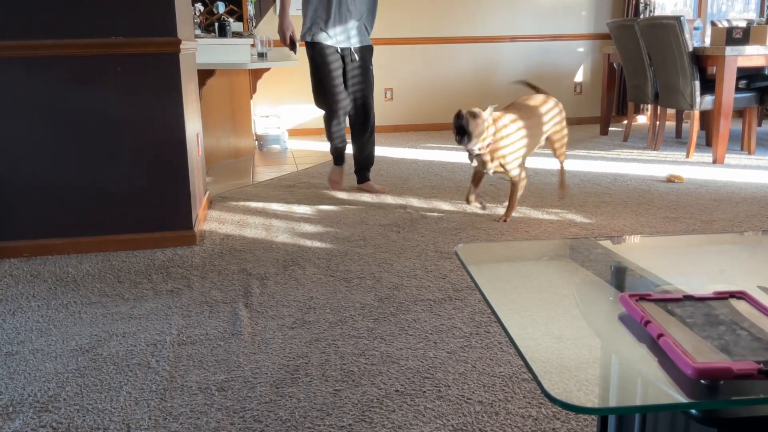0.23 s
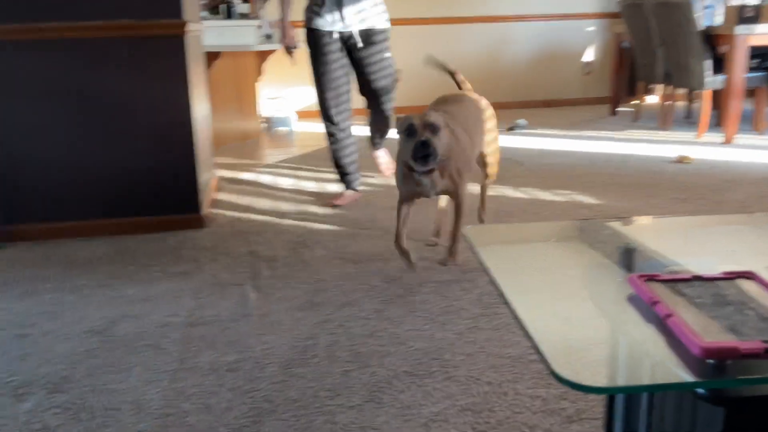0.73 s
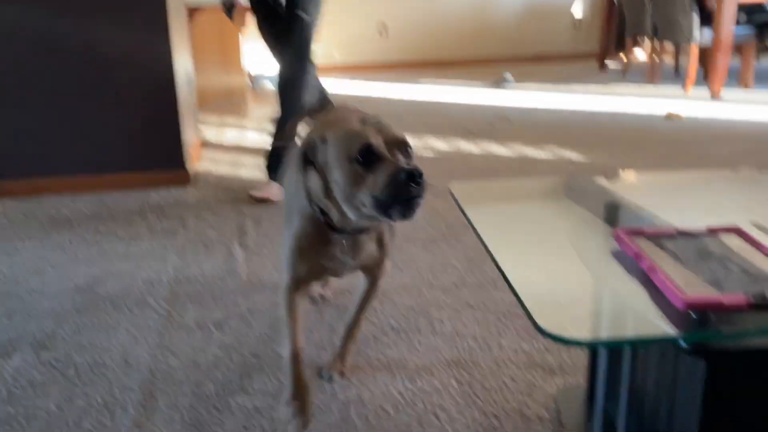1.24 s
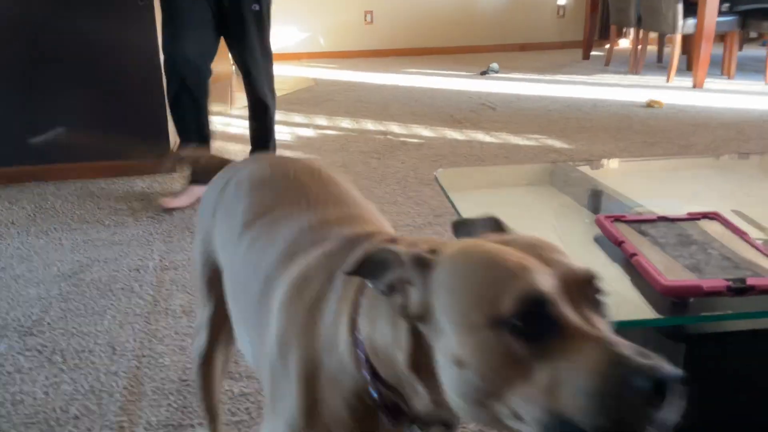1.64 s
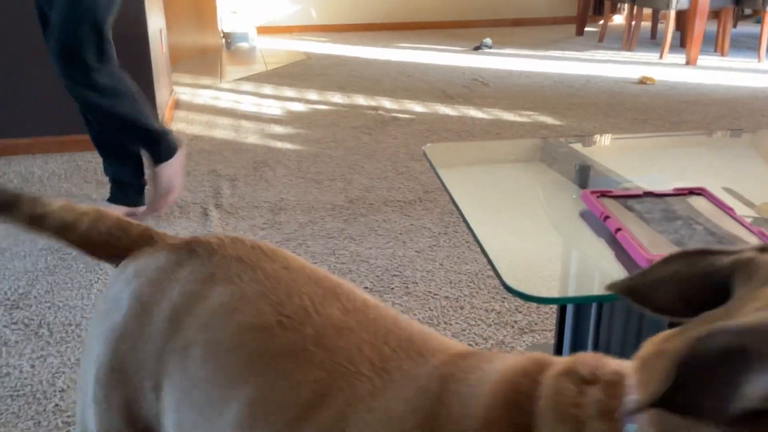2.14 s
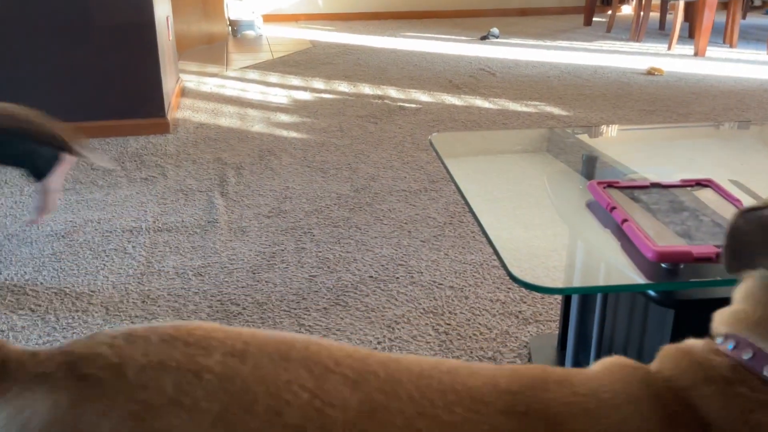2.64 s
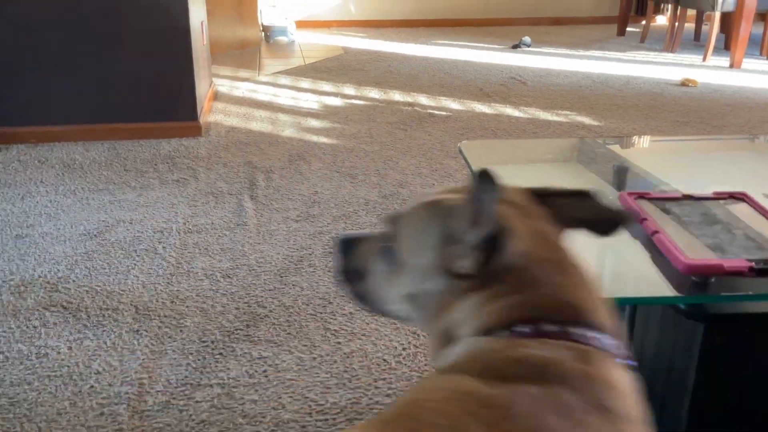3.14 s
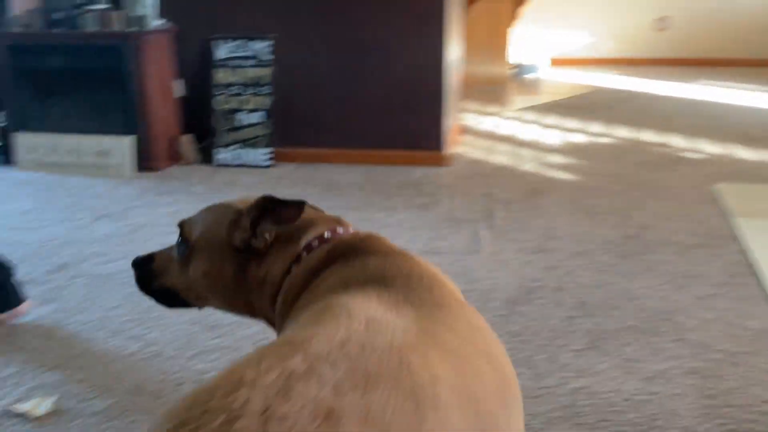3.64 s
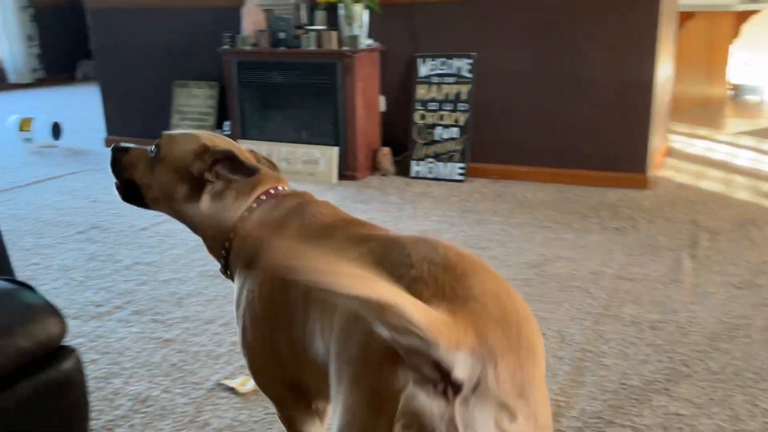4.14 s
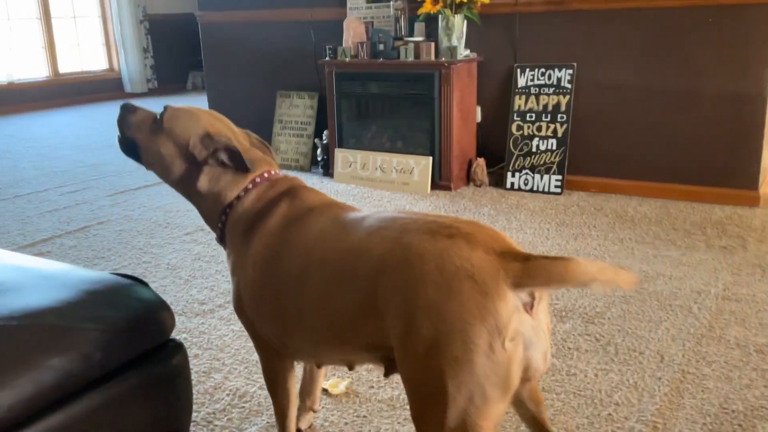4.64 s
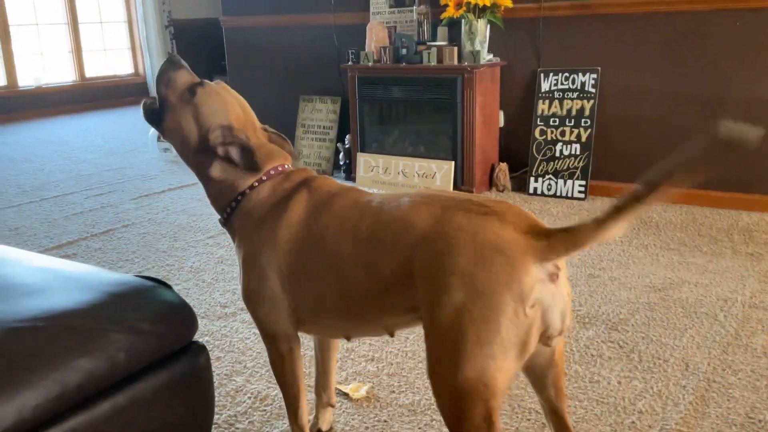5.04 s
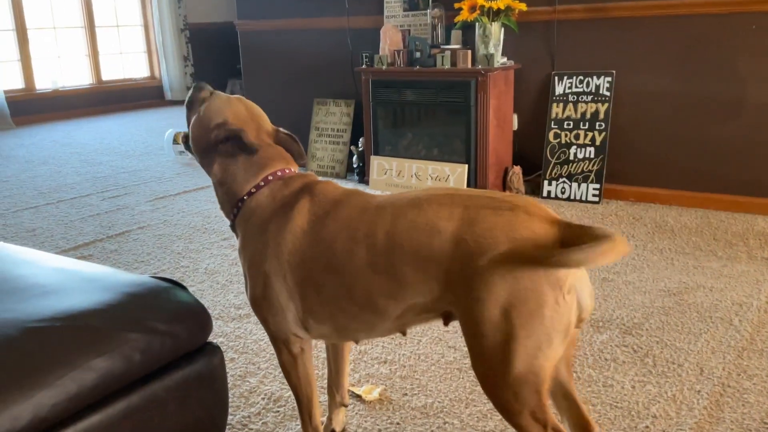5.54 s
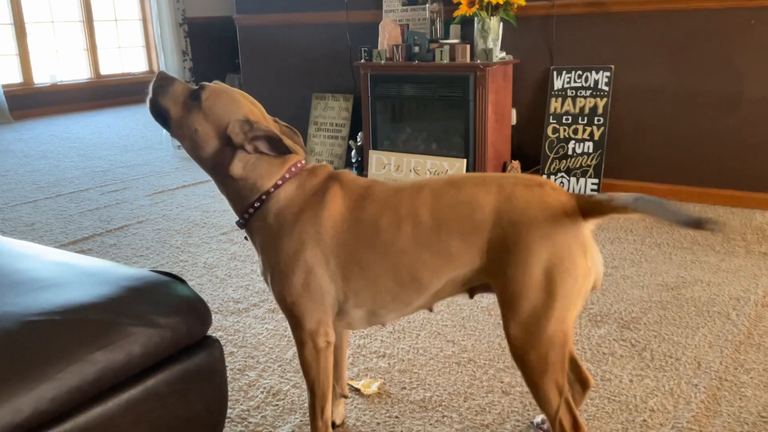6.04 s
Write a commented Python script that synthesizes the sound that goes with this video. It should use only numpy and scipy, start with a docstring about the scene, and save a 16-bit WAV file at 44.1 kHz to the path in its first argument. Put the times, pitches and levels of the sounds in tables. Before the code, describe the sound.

Hoarse, cracking barks from a big dog approaching in a carpeted living room, while a second dog holds one long, slowly sinking howl.

```python
"""Hoarse barks come first, over the last of an earlier howl: a big dog trots across a carpeted living room,
from a few metres off to half a metre from the microphone. Its voice breaks from clear tone to rough roar.
A second dog holds one long, slowly sinking howl, a nearly pure tone, and the first barks on over it.
Between the calls come snorts of filtered noise, ringing collar clicks, soft low thumps and a run of faint,
fast double clicks, all above the quiet noise of the room."""
import sys
import numpy as np
from scipy import signal
from scipy.fft import rfft, irfft
from scipy.io import wavfile
from scipy.ndimage import uniform_filter1d, minimum_filter1d

SR = 44100
rng = np.random.default_rng(int(sys.argv[2]) if len(sys.argv) > 2 else 0)


def persist_wave(psi):
    """Save psi, clipped to +-1, as 16-bit WAV."""
    counts = np.round(np.clip(psi, -1, 1) * 32767).astype(np.int16)
    wavfile.write(sys.argv[1], SR, np.atleast_2d(counts).T)


N = 276948
T = np.arange(N) / SR  # seconds


def undb(db):
    """Decibels to gain."""
    return 10 ** (np.asarray(db) / 20)


def unit(x):
    """Scale to rms 1."""
    return x / np.sqrt(np.mean(x ** 2))


def smooth(x, size=500):
    """Round off corners with two running means of the given size in samples."""
    return uniform_filter1d(uniform_filter1d(x, size), size)


def steady(x, size=1300):
    """Hold the short-term rms near 1."""
    return x / np.sqrt(smooth(x ** 2, size) + 1e-9)


def ramp(start, length):
    """0 before the start, rising evenly to 1 over the length."""
    return np.clip((T - start) / max(length, 1e-3), 0, 1)


def fade(start, t60):
    """A sudden start and an exponential decay by 60 dB in t60 seconds."""
    return (T >= start) * np.exp(-np.log(1000) * np.clip((T - start) / t60, 0, 2))


def curves(rows):
    """The columns of a table as values for every sample."""
    s, *columns = np.transpose(rows)
    return [np.interp(T, s, column) for column in columns]


def during(rows):
    """1 while a table lasts, with soft edges."""
    lasting = (T >= rows[0][0]) & (T <= rows[-1][0])
    return uniform_filter1d(1. * lasting, size=1200)


def noise():
    """White noise."""
    return rng.standard_normal(N)


def wobble(hz):
    """Random motion slower than hz, spread 1."""
    return unit(signal.sosfilt(signal.butter(2, hz, fs=SR, output="sos"), noise()))


def phase_of(hz):
    """Phase in radians of a tone that follows a pitch curve."""
    return 2 * np.pi * np.cumsum(hz) / SR


def band(x, lo_hz, hi_hz, order=4):
    """Band-pass."""
    edges = [lo_hz, min(hi_hz, SR / 2 - 1)]
    return signal.sosfilt(signal.butter(order, edges, "band", fs=SR, output="sos"), x)


def colour(x, points, peaks=()):
    """Filter by a (Hz, dB) outline and (Hz, width in Hz, lift in dB) resonances."""
    f = np.fft.rfftfreq(len(x), 1 / SR) + 1e-3  # keeps the logarithm finite
    hz, db = np.transpose(points)
    gain_db = np.interp(np.log(f), np.log(hz), db)
    for centre, width, lift in peaks:
        gain_db = gain_db + lift / (1 + (2 * (f - centre) / width) ** 2)
    return irfft(rfft(x) * undb(gain_db), len(x))


def bounce(x, lag=0.00083, sway=0.00031, share=0.85):
    """A reflection off a nearby surface; its lag in seconds sways, so notches wander through the treble."""
    return x + share * np.interp(T - lag - sway * wobble(1.6), T, x)


def room(x, wet_db, t60=0.43, treble_t60=0.34):
    """Direct sound plus a dense tail from walls and furniture; the treble dies sooner."""
    t = T[:SR]
    lows = band(rng.standard_normal(SR), 100, 3000) * np.exp(-np.log(1000) * t / t60)
    highs = band(rng.standard_normal(SR), 3000, 16000) * np.exp(-np.log(1000) * t / treble_t60)
    tail = (lows + highs) * (t > .004)
    wet = signal.fftconvolve(x, tail / np.sqrt(np.sum(tail ** 2)))[:N]
    return (x + undb(wet_db) * wet) / np.sqrt(1 + undb(2 * wet_db))


# The quiet living room with nobody calling. Each row: frequency in Hz, outline of the noise in dB.
QUIET_ROOM = [(35, -26.5), (80, -7), (250, 0.5), (500, -7), (1000, -7), (2500, -15), (5000, -31),
              (9000, -24.5), (15500, -26)]


def room_floor(level_db=-68):
    """The room at rest: coloured noise whose level drifts by about a decibel."""
    return undb(level_db + wobble(3)) * unit(colour(noise(), QUIET_ROOM))


# The damped modes that ring in each faint click.
# Each row: frequency in Hz, relative level in dB, 60 dB decay in seconds.
DOUBLE_CLICK_MODES = [(245, -21, 0.083), (1015, -1, 0.089), (1066, -10.5, 0.048), (1920, -10, 0.029),
                      (3500, -18, 0.025)]
DOUBLE_CLICKS_START_S, DOUBLE_CLICKS_PERIOD_S = 2.3728, .0419


def double_clicks(spacing_s=0.0098, level_db=-53, crack_db=-5, count=14):
    """Fourteen faint, evenly spaced double clicks, each a short ring of damped modes and a brief crack."""
    t = T[:SR // 10]
    ring = sum(undb(db) * np.exp(-np.log(1000) * t / t60) * np.sin(2 * np.pi * hz * t)
               for hz, db, t60 in DOUBLE_CLICK_MODES)
    crack = undb(crack_db) * np.exp(-t / 0.00038) * rng.standard_normal(len(t))
    firsts = DOUBLE_CLICKS_START_S + DOUBLE_CLICKS_PERIOD_S * np.arange(count)
    seconds = firsts + spacing_s + 0.00047 * rng.standard_normal(count)
    samples = (np.concatenate([firsts, seconds]) * SR).astype(int)
    strengths = undb(1.5 * rng.standard_normal(2 * count))
    pulses = np.bincount(samples, strengths, N)
    return undb(level_db) * signal.fftconvolve(pulses, ring + crack)[:N]


# Soft thumps of paws on the carpet and of air on the microphone.
# Each row: start in seconds, level in dB before the room, frequency in Hz, 60 dB decay in seconds.
THUMP_HITS = [(1.07, -49.5, 51, 0.19), (1.391, -49.5, 49.7, 0.22), (1.95, -81, 71.5, 0.35),
              (2.461, -53.5, 70, 0.22), (3.09, -63, 65.5, 0.26), (3.784, -32.5, 218, 0.03),
              (3.802, -45, 94.96, 0.073)]


def thumps():
    """Dull thumps: low sine tones that start suddenly and decay."""
    return sum(undb(db) * fade(s, t60) * np.sin(2 * np.pi * hz * (T - s)) for s, db, hz, t60 in THUMP_HITS)


# The collar clicking. Each row: start in seconds, level in dB before the common trim, ring in Hz.
COLLAR_CLICKS = [(0.9233, -60.5, 3720), (2.2637, -28, 7710), (2.36, -50.5, 3470), (2.4843, -55, 14170),
                 (2.529, -47.5, 3460), (2.9213, -37.5, 10300), (3.001, -33.5, 3100), (5.3556, -32, 4390)]


def collar_clicks(t60=0.029, trim_db=-8):
    """Bright clicks: decaying bursts of noise in a wide band around each ring."""
    rattle = noise()
    return sum(undb(db + trim_db) * fade(s, t60) * unit(band(rattle, hz / 2, hz * 5.2, order=2))
               for s, db, hz in COLLAR_CLICKS)


# Puffs through the nose. Each row: centre in seconds, half length in seconds, nasal hum in dB and
# hiss in dB, both before the room.
NOSE_PUFFS = [(1.771, 0.056, -52, -40), (3.362, 0.046, -36, -51.5), (3.461, 0.049, -51, -38),
              (4.714, 0.0079, -38, -57), (5.416, 0.034, -37, -52.5)]
# Colour of breath noise, here and in the howl. Each row: frequency in Hz, level in dB.
BREATH_COLOUR = [(1500, -19), (2200, -8.5), (3000, -6), (4200, -3.5), (5300, -12), (6500, -7.5),
                 (9000, -14.5), (12000, -25), (15500, -30.5)]
# Resonances of the muzzle. Each row: frequency in Hz, width in Hz, lift in dB.
MUZZLE = [(2930, 120, 11.5), (4300, 190, 3.5)]


def snorts(flutter_db=1.0):
    """Puffs of air hiss at the quivering nostrils and ring the muzzle."""
    flutter = undb(flutter_db * wobble(60))
    hiss = unit(bounce(colour(noise(), BREATH_COLOUR, MUZZLE)) * flutter)
    hum = unit(band(noise(), 940, 1250, order=3))
    return sum(np.exp(-((T - s) / half) ** 2) * (undb(hum_db) * hum + undb(hiss_db) * hiss)
               for s, half, hum_db, hiss_db in NOSE_PUFFS)


def whine(rows, second_db, third_db, jitter=0.0034):
    """A short closed-mouth tone of three harmonics; the upper two are in dB against the first."""
    hz, db = curves(rows)
    phase = phase_of(hz * (1 + jitter * wobble(60)))
    tone = np.sin(phase) + undb(second_db) * np.sin(2 * phase) + undb(third_db) * np.sin(3 * phase)
    return tone * undb(db) * during(rows)


# A low grumble that leads into a bark. Each row: time in seconds, pitch in Hz, first harmonic in dB
# before the room.
LOW_GRUMBLE = [(3.98, 218, -66.5), (4.05, 202, -63), (4.13, 203, -55), (4.18, 219, -52.5), (4.22, 260, -54)]


def grumble():
    """A low voiced tone whose second harmonic is stronger than its first."""
    return whine(LOW_GRUMBLE, second_db=4, third_db=-2)


# The end of an earlier howl. Each row: time in seconds, pitch in Hz, first harmonic in dB before the room.
EARLIER_HOWL = [(0, 802, -16), (.09, 726, -24.5), (.15, 729, -14.5), (.21, 670, -64)]


def last_howl():
    """A nearly pure tone that sinks and stops."""
    return whine(EARLIER_HOWL, second_db=-22, third_db=-20)


# The second dog's howl scoops up and sinks slowly. Each row: time in seconds, pitch in Hz.
HOWL_PITCH = [(2.91, 496.9), (2.954, 628.1), (3.0, 755.9), (3.032, 786), (3.096, 838), (3.174, 820),
              (3.368, 774.6), (3.386, 761.4), (3.854, 713.5), (4.02, 725.6), (4.18, 680.6)]
# Then it wavers on under the barks. Each row: time in seconds, pitch in Hz.
HOWL_WAVERING = [(4.462, 661.7), (4.675, 677), (4.731, 659.7), (4.795, 622.2), (4.917, 655.5), (5.188, 653),
                 (5.24, 624), (5.4, 627.6)]
# Its strength. Each row: time in seconds, fundamental in dB, second harmonic in dB, gain of the higher
# harmonics in dB.
HOWL_STRENGTH = [(2.905, -61, -80, -104), (2.96, -28, -49.5, -64), (3.05, -14, -43, -52.5),
                 (3.24, -13, -41.5, -51), (3.58, -26, -26, -56.5), (3.82, -20.5, -40, -59.5),
                 (4.0, -24.5, -48.5, -60.5), (4.11, -20, -45, -60), (4.3, -27, -36.5, -61),
                 (4.62, -17.5, -43.5, -63.5), (4.83, -19.5, -37, -66.5), (4.91, -16.5, -34, -71),
                 (5.05, -23.5, -34.5, -63), (5.13, -14.5, -42.5, -66), (5.205, -13.5, -49, -59.5),
                 (5.235, -33, -36.5, -58.5), (5.43, -24, -37.5, -55.5), (5.55, -27, -45, -60)]
# Brief dips where the tone cancels against its own echo. Each row: centre in seconds, depth in dB.
ECHO_DIPS = [(3.004, -11), (3.105, -4.5), (3.314, -3), (3.387, -7), (3.591, -14.5), (3.759, -18.5),
             (3.897, -13.5), (3.98, -5.5), (4.152, -11), (4.205, -15.5), (4.5, -7), (4.564, -12.5),
             (4.692, -14), (4.785, -8.5), (4.864, -14.5), (5.3, -5), (5.397, -24.5)]
# The howling throat above the second harmonic. Each row: frequency in Hz, level in dB.
HOWLING_THROAT = [(1400, -3.5), (1900, 4.5), (2250, 18), (2550, -1), (2950, -1), (3400, 4.5), (3900, -8.5),
                  (4450, -5), (5200, -4), (6100, -14), (8000, -11.5), (11000, -13), (15000, -21.5)]
# Its sharp resonances. Each row: frequency in Hz, width in Hz, lift in dB.
HOWLING_RESONANCES = [(2630, 33, 22.5), (3437, 170, 5.5), (4484, 220, 9)]
DIP_HALF_S = 0.013
THROB_DB, THROB_HZ = 1.2, 28  # the fundamental throbs at random


def howl(jitter=.005, air_db=-18, flutter_db=6.5):
    """A nearly pure head tone with thin overtones, which flutter as they mix with their own echoes."""
    hz, = curves(np.vstack([HOWL_PITCH, HOWL_WAVERING]))
    db, second_db, upper_db = curves(HOWL_STRENGTH)
    phase = phase_of(hz * (1 + jitter * wobble(100)))
    dips_db = sum(depth_db * np.exp(-((T - s) / DIP_HALF_S) ** 2) for s, depth_db in ECHO_DIPS)
    dips = undb(THROB_DB * wobble(THROB_HZ) + dips_db)
    tone = np.sqrt(2) * smooth(undb(db)) * np.sin(phase)
    second = np.sqrt(2) * undb(second_db + flutter_db * wobble(3.4)) * np.sin(2 * phase)
    # each overtone swells and fades on its own as it glides through the standing waves of the room
    harmonics = sum(undb(3.5 * wobble(7)) * np.sin(k * phase) for k in np.arange(3, 23))
    upper = colour(harmonics, HOWLING_THROAT, HOWLING_RESONANCES)
    # breath escapes in step with the voice
    air = undb(air_db) * unit(colour(noise(), BREATH_COLOUR)) * (1 + np.cos(phase))
    overtones = second + undb(upper_db) * (upper + air)
    lasting = during(HOWL_STRENGTH)
    return dips * room(tone * lasting, wet_db=-15) + room(overtones * lasting, wet_db=-2)


# The big dog's barks, one row a bark, except that the last row is the closing "oo" of the bark before it.
# Each row: onset of the clear tone in seconds, lead-in in seconds,
# clear tone in seconds, roar in seconds, falling end in seconds, tone pitch in Hz, roar pitch in Hz,
# roar roughness 0-1, clear tone in dB, then for the start of the roar, before jaw, hiss arch and room:
# fundamental in dB, lower mouth resonances in dB, upper mouth resonances in dB, hiss in dB.
BARK_CALLS = [ (-.03, .03, .036, .035, 0.12, 620, 588.9, 0.98, -11, -27, -19, -22.5, -30),
              (0.199, 0.05, 0.011, 0.14, 0.11, 559.2, 638.1, .8, -63, -23.5, -15, -18, -31),
              (.48, .035, .012, .19, 0.12, 505, 536, 0.83, -50, -23.5, -22.5, -25, -41),
              (1.05, .034, .052, .075, 0.11, 578, 518.6, .35, -13, -23, -18, -21.5, -35.5),
              (1.387, 0.034, .026, .088, 0.075, 606.7, 512.2, 0.09, -10, -21.5, -13, -20.5, -33.5),
              (1.935, .06, .012, .115, .22, 558.6, 594.6, 0.46, -20.5, -17, -13.5, -20, -37.5),
              (4.246, .07, .022, .115, .09, 641.1, 565, .55, -21, -25.5, -17.5, -22, -37.5),
              (4.992, .042, .017, .11, .1, 619.2, 504, .5, -14, -25.5, -17, -25, -34),
              (5.48, 0.11, .02, .135, .11, 608.4, 568.7, .75, -22.5, -23, -19.5, -26.5, -38.5),
              (5.821, .055, 0.028, .115, 0.029, 536.4, 490.4, 0.29, -38, -20.5, -16.5, -33, -41),
              (5.99, .03, .02, 0.011, 0.091, 537.7, 463, 0, -27, -29.5, -35, -46, -51), ]
# pitch climbs into the tone, slips to the roar as the voice breaks, and sinks as the breath runs out
CLIMB_HZ_PER_S, CLIMB_OVERSHOOT_S, SLIP_S, FALL_HZ_PER_S, LOWEST_HZ = 1900, .012, .04, 1300, 241.6
# through the roar the pitch sags, and it wanders by a share of itself at full roughness
ROAR_SAG_HZ_PER_S, WANDER = 350, 0.02497
LEAD_ROUGH, TONE_ROUGH, END_ROUGH = 0.452, 0.058, 0.3012  # roughness 0-1 outside the roar
TONE_EDGE_S, STOP_S = 0.01, .04  # how fast the clear tone switches and the voice stops
# the jaw opens as the voice breaks; until then it muffles (lower resonances, upper resonances, hiss)
JAW_OPEN_S, JAW_SHUT_DB = 0.022, (-9.5, -11, -13.5)
# in the clear tone (lower resonances, upper resonances, hiss) against the fundamental
TONE_TIMBRE_DB = (-12.5, -24.5, -37)
# the roar weakens from start to end; the hiss is weaker at its ends than in its middle
ROAR_SAG_DB, HISS_ARCH_DB = -3.5, -1.5
# release of (fundamental, lower resonances, upper resonances, hiss); the fundamental outlasts the roar
RELEASE_DB_PER_S, CHEST_LINGER_S = (132, 216, 184, 190), 0.061


def bark_gestures():
    """Larynx, lungs and jaw through all rows: pitch, roughness and the gains of the four registers."""
    hz, rough, gains = np.full(N, 1. * LOWEST_HZ), np.zeros(N), np.zeros((4, N))
    for s, lead, clear, roar, fall, tone_hz, roar_hz, roar_rough, tone_db, chest_db, *open_db in BARK_CALLS:
        begins, breaks, ends = s - lead, s + clear, s + clear + roar
        spent = np.maximum(T - ends, 0)  # seconds since the roar ended
        through = ramp(breaks, roar)  # share of the roar gone by
        tone = ramp(s - TONE_EDGE_S, TONE_EDGE_S) - ramp(breaks, TONE_EDGE_S)

        # the larynx
        climbing = tone_hz - CLIMB_HZ_PER_S * np.maximum(s + CLIMB_OVERSHOOT_S - T, 0)
        sag_hz = ROAR_SAG_HZ_PER_S * roar * (through - .5)
        sinking = roar_hz - sag_hz - FALL_HZ_PER_S * spent
        pitch = climbing + (sinking - climbing) * ramp(breaks, SLIP_S)
        hoarse = np.select([T < s, T < ends], [LEAD_ROUGH, roar_rough], END_ROUGH)
        hz = np.where(T >= begins, np.maximum(pitch, LOWEST_HZ), hz)
        rough = np.where(T >= begins, hoarse + (TONE_ROUGH - hoarse) * tone, rough)

        # the lungs and the jaw
        push = ramp(begins, lead) ** 2 - ramp(ends + fall, STOP_S)
        shut = 1 - ramp(breaks, JAW_OPEN_S)
        chest = chest_db - RELEASE_DB_PER_S[0] * np.maximum(spent - CHEST_LINGER_S, 0)
        mouth, teeth, hiss = (db + shut_db * shut - release * spent
                              for db, shut_db, release in zip(open_db, JAW_SHUT_DB, RELEASE_DB_PER_S[1:]))
        hiss = hiss + HISS_ARCH_DB * (2 * through - 1) ** 2
        clear_db = tone_db + np.array([0, *TONE_TIMBRE_DB])[:, None]
        roar_db = np.array([chest, mouth, teeth, hiss]) + ROAR_SAG_DB * through
        gains += push * (undb(roar_db) + tone * undb(clear_db))
    rough = np.clip(smooth(rough, size=200), 0, 1)
    return hz * (1 + WANDER * rough * wobble(14.34)), rough, gains


# The barking dog's throat and mouth. Each row: frequency in Hz, level in dB.
BARKING_THROAT = [(250, -40.5), (400, 2), (580, 9.5), (800, 7), (1100, -4.5), (1800, -9.5), (2500, -10.5),
                  (3100, -28), (3800, -36.5), (5000, -31.5), (6300, -36), (8000, -34), (10000, -42),
                  (15500, -48.5)]
# Its sharp resonances. Each row: frequency in Hz, width in Hz, lift in dB.
BARKING_RESONANCES = [(999.4, 120, 15.5), (1259, 490, 18), (1520, 24, 8), (1842, 210, 3.5), (2218, 55, 3),
                      (2532, 37, 8.5), (3600, 65, 9.5)]
# How far the barking dog is from the microphone. Each row: time in seconds, distance in metres.
DOG_DISTANCE = [(0, 1.53), (.6, 2.8), (1.1, 1.24), (1.5, 1.04), (2.0, .5), (4.2, 2.1), (6.2, 1.65)]
# at 1 m: room echo of the fundamental and of the overtones, and the low rush of air against the fundamental
ECHO_LOW_DB, ECHO_HIGH_DB, RUSH_DB = -10, -9, -50
ECHO_DB_PER_DOUBLING = 4  # of the distance


def barks(jitter=.055, shimmer=.3, half_lines=.3):
    """Each bark starts as a clear tone and breaks into a hoarse roar as the vocal folds turn chaotic."""
    hz, rough, (chest_gain, mouth_gain, teeth_gain, hiss_gain) = bark_gestures()
    phase = phase_of(hz * (1 + jitter * rough * wobble(110)))
    # rough cycles differ in size and alternate strong and weak
    size = 1 + rough * (shimmer * wobble(180) + half_lines * np.cos(phase / 2))
    # loose tissue above the folds flaps at its own rate and adds side tones
    flap_hz = 0.45 * hz * (1 + 0.1174 * wobble(34.9))
    flap = 1 + 1.1 * rough * np.sin(phase_of(flap_hz))
    overtones = sum(np.cos(k * phase) / k for k in np.arange(2, 22)) * size * flap
    voiced = colour(overtones, BARKING_THROAT, BARKING_RESONANCES)
    # air rushes through the folds once a cycle
    puffs = noise() * (1 + 0.58 * np.cos(phase)) * size
    air = colour(puffs, BARKING_THROAT, BARKING_RESONANCES)

    def register(tone, lo_hz, hi_hz, air_share):
        """Tone and turbulence within one range of resonances."""
        air_share = np.clip(air_share, 0, 1)
        turbulence = steady(band(air, lo_hz, hi_hz))
        return np.sqrt(1 - air_share) * steady(tone) + np.sqrt(air_share) * turbulence

    chest = register(np.sin(phase) * size, 400, 780, .55 * rough ** 2)
    mouth = register(band(voiced, 780, 1700), 760, 1700, .5 * rough ** 1.5)
    teeth = register(band(voiced, 1700, 3400), 1700, 3600, .15 + .5 * rough)
    hiss = register(band(voiced, 3500, 15000), 3600, 17000, .6 + .6 * rough)
    hiss = steady(bounce(bounce(hiss)))
    low = chest * chest_gain
    high = mouth * mouth_gain + teeth * teeth_gain + hiss * hiss_gain

    # the farther the dog, the more room
    metres = np.maximum(curves(DOG_DISTANCE)[0], .2)
    far_db = ECHO_DB_PER_DOUBLING * np.log2(metres)
    # the open mouth radiates hardly any bass, so its low rush is strongest close by
    rush = undb(RUSH_DB) * unit(band(noise(), 64, 210, order=2)) * chest_gain / metres
    low = room(band(low, 382, 2000), wet_db=ECHO_LOW_DB + far_db)
    high = room(high, wet_db=ECHO_HIGH_DB + far_db)
    return low + high + rush


def scene():
    """Both dogs and the small sounds in the quiet room."""
    small = thumps() + collar_clicks() + snorts() + grumble() + last_howl()
    background = room_floor() + double_clicks() + room(small, wet_db=-8.5)
    return (background + howl() + barks())[None]


def record(dry, ceiling=.66, top_hz=15850):
    """A fast limiter holds down the loudest peaks, and a steep low-pass cuts the top."""
    needed = np.minimum(1, ceiling / (np.abs(dry) + 1e-9))
    gain = smooth(minimum_filter1d(needed, size=500), size=250)
    return signal.sosfilt(signal.ellip(10, .1, 80, top_hz, fs=SR, output="sos"), dry * gain)


dry = scene()
out = record(dry)
persist_wave(out)
```